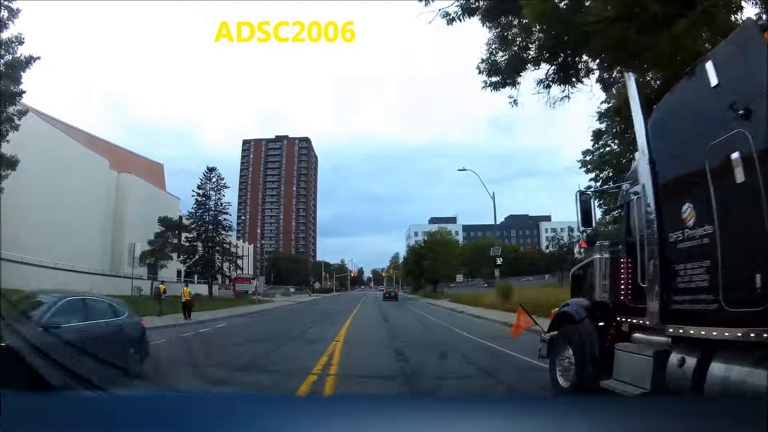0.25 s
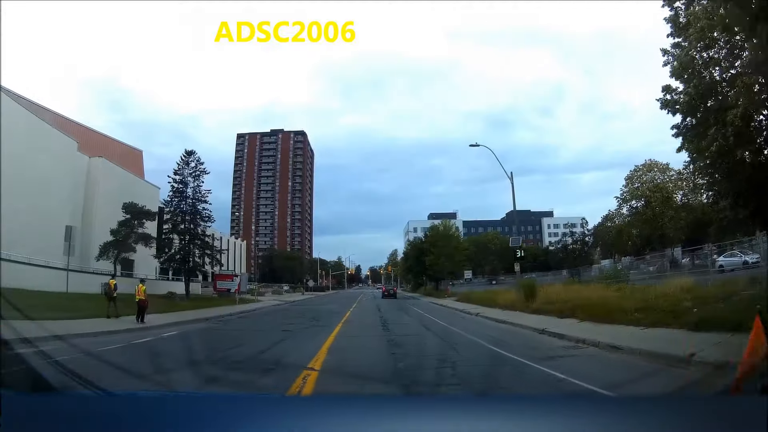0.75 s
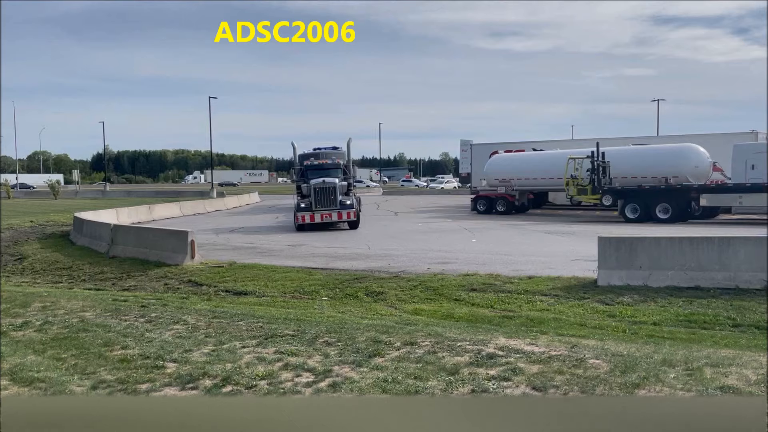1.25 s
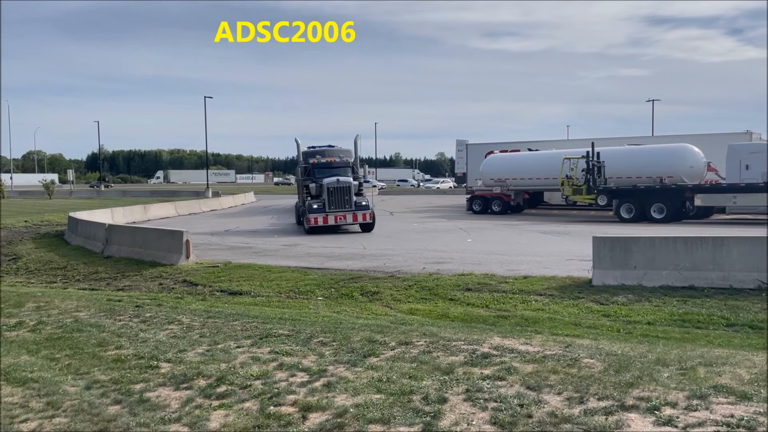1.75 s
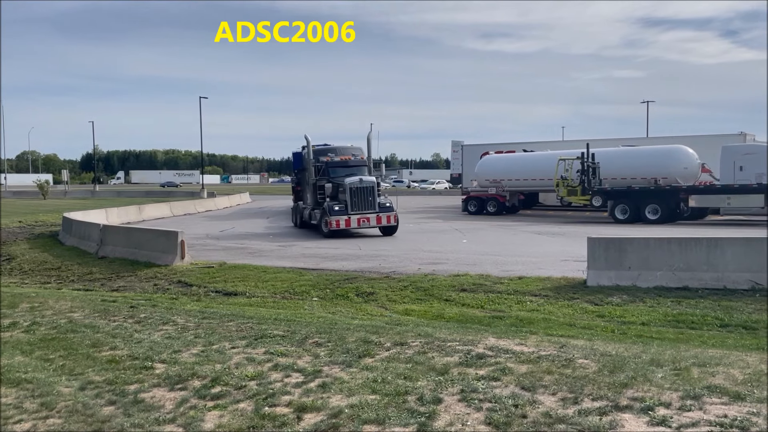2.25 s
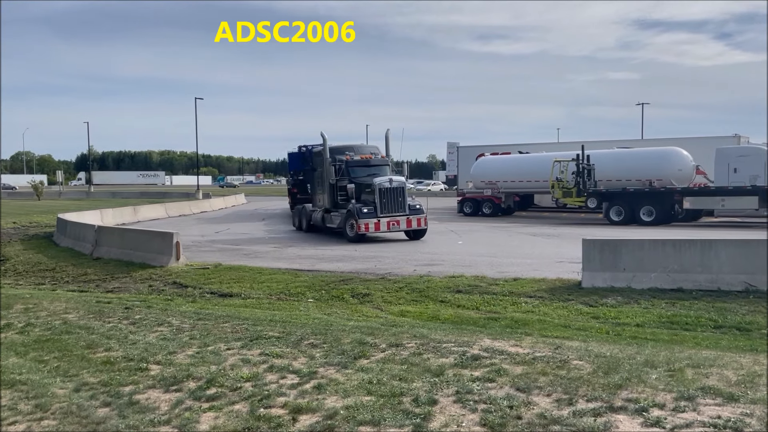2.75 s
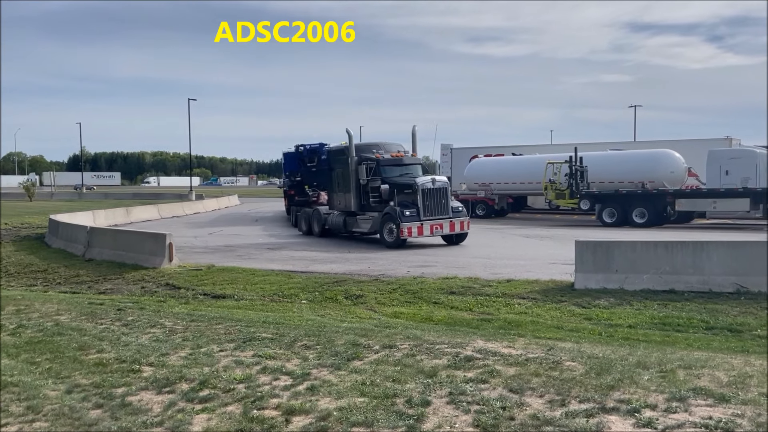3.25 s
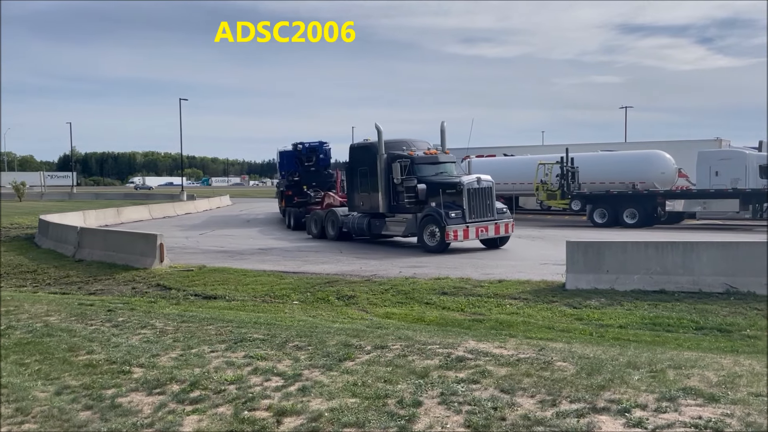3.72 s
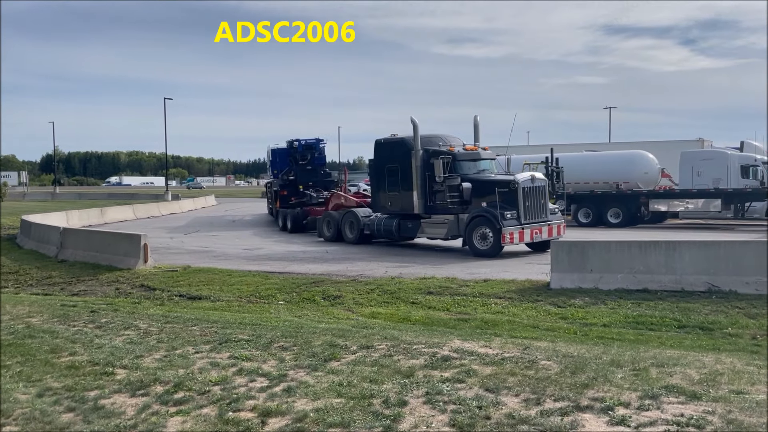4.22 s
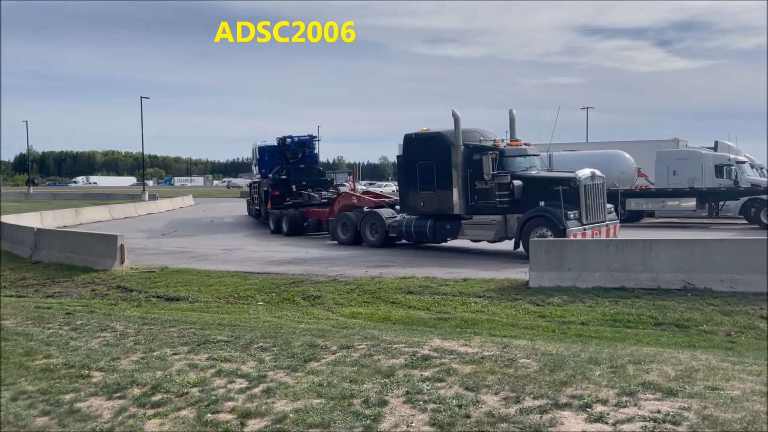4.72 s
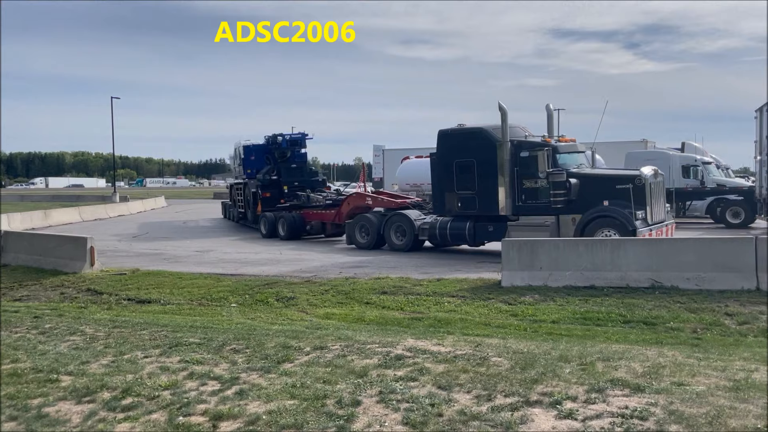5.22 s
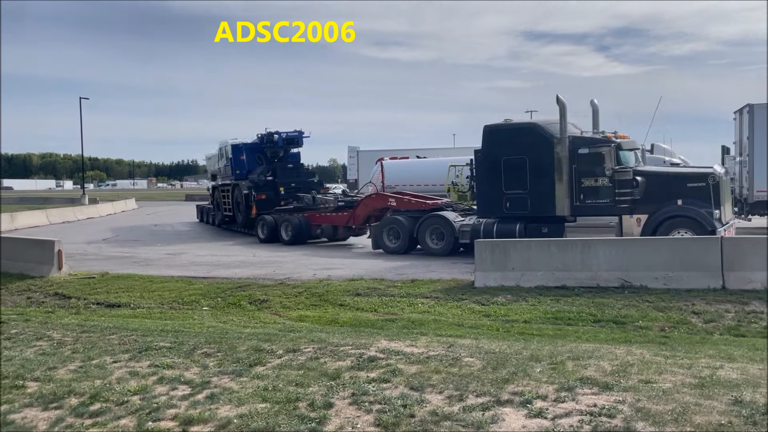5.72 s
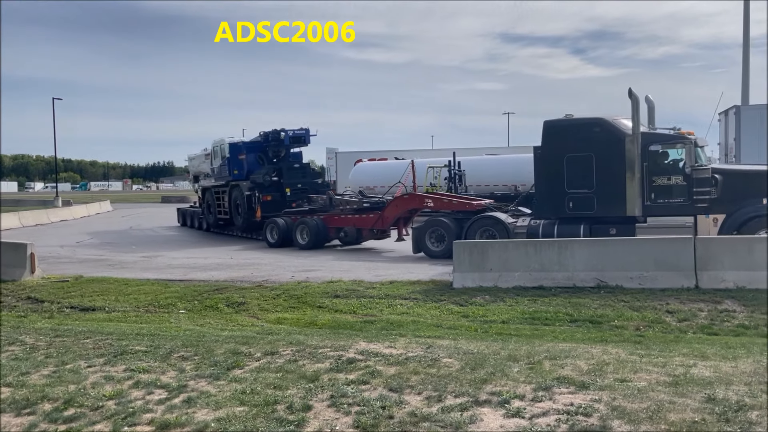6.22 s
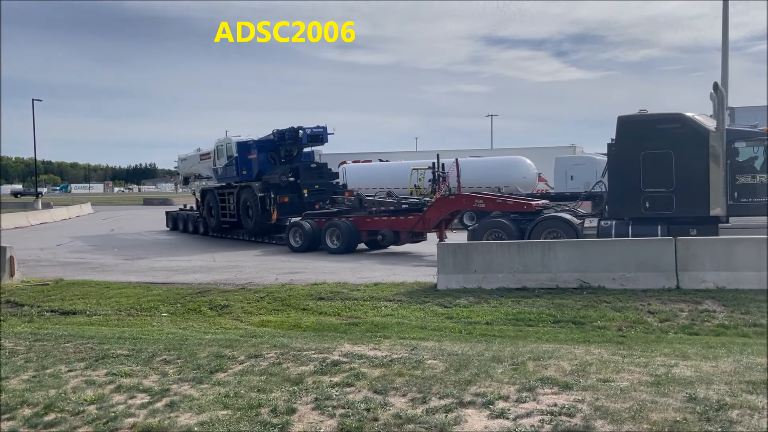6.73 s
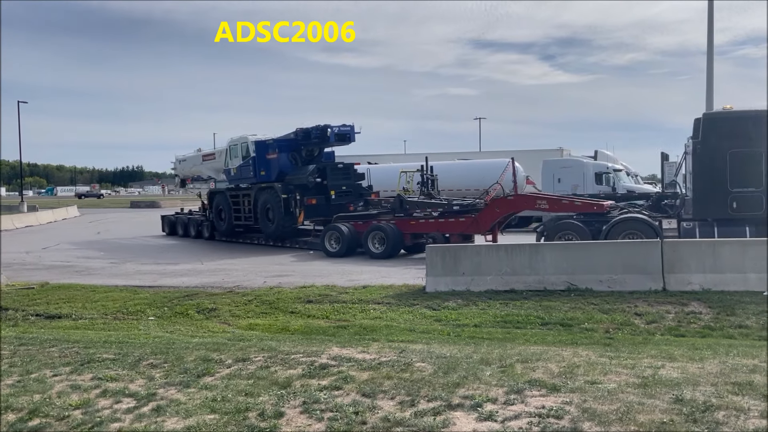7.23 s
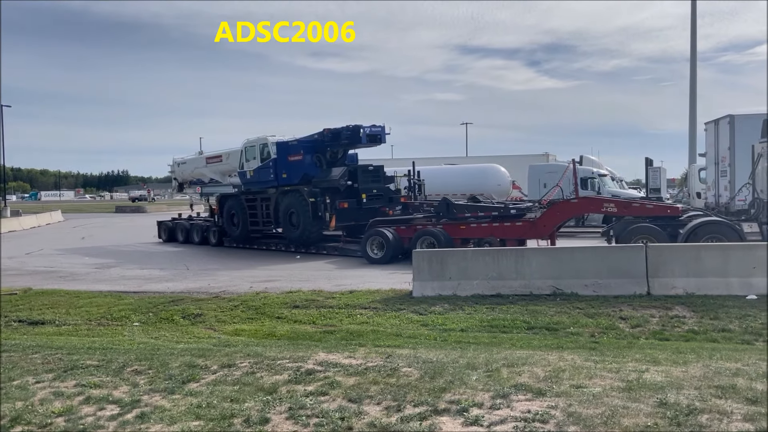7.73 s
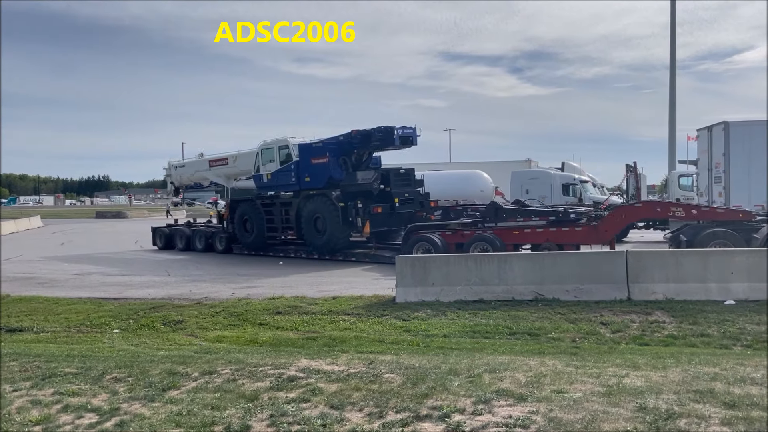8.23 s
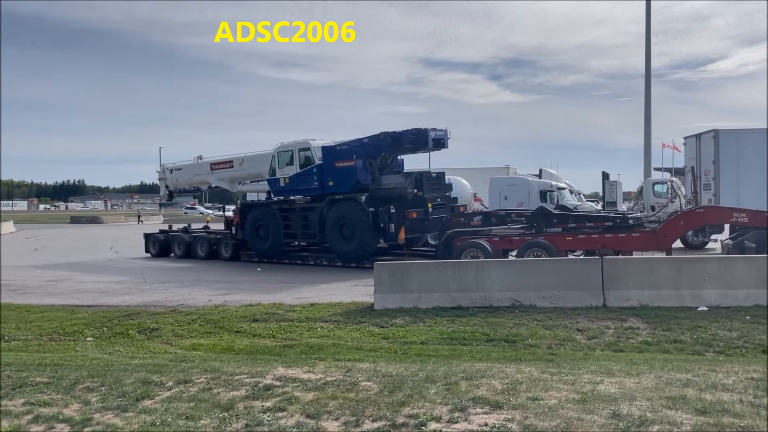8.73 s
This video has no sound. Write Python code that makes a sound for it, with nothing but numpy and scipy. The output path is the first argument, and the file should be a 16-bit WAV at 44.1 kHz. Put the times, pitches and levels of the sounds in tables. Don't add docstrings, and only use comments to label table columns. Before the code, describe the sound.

A phone-like microphone first catches close, boomy road rumble in a car, then abruptly stands on grass beside a truck lot. A diesel engine runs steadily with uneven knocks, panel clatter, ticking valve covers and airy fan noise. Brake squeal and air hisses come early, trailer clunks later, then loose fittings rattle and a thin high turbo whistle spools up over distant traffic.

```python
import sys
import numpy as np
from scipy import signal
from scipy.fft import rfft, irfft
from scipy.io import wavfile
from scipy.ndimage import uniform_filter1d

SR = 44100
rng = np.random.default_rng(int(sys.argv[2]) if len(sys.argv) > 2 else 0)


def dump(signal):
    limited = np.clip(np.atleast_2d(signal).T, -1, 1)
    pcm = np.round(limited * 32767).astype(np.int16)
    wavfile.write(sys.argv[1], SR, pcm)


def rack_gain(trim_db):
    fader = np.asarray(trim_db, float)
    return 10 ** (fader / 20)


N = 395577
T = np.arange(N) / SR
HZ = np.arange(N // 2 + 1) * SR / N
CAR_END_S, LOT_START_S = 1.341, 1.388


def level(x, db=0):
    return x * rack_gain(db) / np.sqrt(np.mean(x ** 2))


def curves(table):
    s, *columns = np.transpose(table)
    return [np.interp(T, s, c) for c in columns]


def over_hz(table, **ends):
    hz, value = np.transpose(table)
    return np.interp(np.log(HZ + 1), np.log(hz + 1), value, **ends)


def shape(x, gain):
    return irfft(rfft(x) * gain, N)


def modes(table):
    w = HZ + 1e-6
    out = 0
    for k, (hz, width, db) in enumerate(table):
        out = out + (-1) ** k * rack_gain(db) / (1 + 1j * hz / width * (w / hz - hz / w))
    return out


def noise():
    return rng.standard_normal(N)


def band_noise(hz, width):
    return level(shape(noise(), modes([(hz, width, 0)]) ** 2))


def walk(rate):
    k = int(SR / rate)
    held = np.repeat(rng.standard_normal(N // k + 1), k)
    return 1.3 * uniform_filter1d(uniform_filter1d(held, k), k)[:N]


def tone(hz):
    return np.sin(2 * np.pi * np.cumsum(hz) / SR)


def roar(gain, swell_db, flicker_db):
    white, swell, out = rfft(noise()) * gain, walk(4), 0
    for octave in range(4, 15):
        share = np.cos(np.pi / 2 * np.clip(np.log2(HZ + 1) - octave, -1, 1)) ** 2
        out = out + irfft(white * share, N) * rack_gain(swell_db * swell + flicker_db * walk(8))
    return level(out)


def burst(start, rise, hold, t60):
    t = T - start
    return np.clip(t / rise, 0, 1) * rack_gain(-60 * np.clip(t - rise - hold, 0, 5 * t60) / t60)


def swells(table, rest_db):
    bells = [rack_gain(db) * np.exp(-((T - s) / half) ** 2) for s, db, half, *_ in table]
    return np.array(bells + [rack_gain(rest_db) + 0 * T])


# f/Hz, level/dB
WHINE_TONES = [(7214, -78), (14422, -71)]


def electric_whine():
    return sum(rack_gain(db + 3.5) * np.sin(2 * np.pi * hz * T) for hz, db in WHINE_TONES)


# f/Hz, density/dB per Hz
ROAD_SPECTRUM = [(120, -41), (200, -6), (472, -9), (788, -8), (1220, -9), (1310, -18), (1410, -12),
                 (1700, -9), (1860, -21.5), (2490, -31), (3050, -31), (8800, -48), (13700, -45.5),
                 (15000, -47), (15800, -63)]
# f/Hz, width/Hz, level/dB
ROAD_RESONANCES = [(805, 34, -12.5), (1253, 23, -5), (1406, 61, -8.5), (2930, 330, -15.5), (5060, 530, -13)]


def road_roar(boom_db):
    gain = rack_gain(over_hz(ROAD_SPECTRUM, left=-60, right=-120))
    road = roar(gain * (1 + 4.2 * np.abs(modes(ROAD_RESONANCES))), 0.33, 0.52)
    road_db = -37.5 - 2 * np.minimum(T, CAR_END_S) + 0.1 * (boom_db + 19)
    return rack_gain(road_db) * road


# t/s, peak level/dB, treble level/dB, t60/s
TRIM_TICKS = [
    (0.1494, -44, -25, 0.06),
    (0.1619, -40.5, -21, 0.055),
    (0.1625, -36.5, -24, 0.044),
    (0.5396, -45, -28, 0.06),
    (1.1232, -44, -21, 0.06),
    (1.1432, -50.5, -16.5, 0.06),
    (1.1735, -32.5, -40, 0.056),
    (1.2144, -48, -24, 0.055),
]


def trim_ticks():
    low, high, out = band_noise(3070, 3200), band_noise(10500, 6000), 0
    for s, db, treble_db, t60 in TRIM_TICKS:
        out = out + rack_gain(db - 9) * burst(s, 0.00048, 0.0023, t60) * (low + rack_gain(treble_db + 6) * high)
    return out


# t/s, length/s, f/Hz, level/dB
PANEL_BUMPS = [
    (0.233, 0.07, 142, -30.5),
    (0.315, 0.06, 138, -29),
    (1.12, 0.15, 130, -38.5),
    (0.41, 0.061, 205, -46),
    (1.143, 0.15, 72, -30),
    (0.228, 0.071, 430, -44.5),
]


def panel_bumps():
    out = 0
    for s, length, hz, db in PANEL_BUMPS:
        swell = np.sin(np.pi * np.clip((T - s) / length, 0, 1))
        out = out + rack_gain(db + 4.5 * walk(24.9)) * swell * np.sin(2 * np.pi * hz * T)
    return out


# f/Hz, width/Hz, level/dB
DRUM_MODES = [(69, 16.2, 1), (112, 21, -3), (141.7, 12.2, -5.5), (192, 30, -8.5), (234.6, 47, -13)]


def body_drum(boom_db):
    return rack_gain(-32 + 0.41 * (boom_db + 20.5)) * level(shape(noise(), modes(DRUM_MODES)))


# t/s, level/dB, half length/s
ROAD_WAVES = [
    (.05, -17, 0.065),
    (.25, -17, 0.1),
    (.6, -21.5, 0.1),
    (1.01, -24.5, 0.037),
    (1.18, -33, 0.044),
]
# t/s, level/dB, half length/s, f/Hz
ROAD_JOINTS = [
    (0.225, -15, 0.054, 41.8),
    (.49, -20, 0.069, 36.6),
    (.92, -19.5, 0.0644, 44.1),
    (1.216, -21, 0.074, 42.7),
]


def cabin_boom():
    heave_db = 20 * np.log10(swells(ROAD_WAVES, -34).sum(0))
    booms = swells(ROAD_JOINTS, -31)
    boom_db = 20 * np.log10(booms.sum(0))
    boom_hz = np.array([row[-1] for row in ROAD_JOINTS] + [49.7]) @ booms / booms.sum(0)
    out = rack_gain(heave_db + 0.5) * tone(16 * (1 + 0.15 * walk(8)))
    out = out + rack_gain(boom_db - 1) * tone(boom_hz * (1 + 0.067 * walk(19.66)))
    out = out + rack_gain((heave_db + boom_db) / 2 - 4) * band_noise(26.7, 9.1)
    return out, boom_db


def car():
    boom, boom_db = cabin_boom()
    out = electric_whine() + road_roar(boom_db) + trim_ticks() + panel_bumps() + body_drum(boom_db) + boom
    out = np.tanh(out / 0.45) * 0.45
    return out * np.sin(np.pi / 2 * np.clip((CAR_END_S - T) / 0.006, 0, 1)) ** 2


# f/Hz, density/dB per Hz
HIGHWAY_SPECTRUM = [(22, -16), (40, -3.5), (75, 3.5), (130, -4.5), (250, -15), (450, -14), (750, -15.5),
                    (1250, -12), (2000, -22), (3000, -25.5), (5500, -42.5), (8000, -46.5), (12000, -55),
                    (15500, -71)]


def highway():
    return rack_gain(-40.5) * roar(rack_gain(over_hz(HIGHWAY_SPECTRUM, left=-42, right=-120)), 0.48, 0.32)


# t/s, level/dB, f/Hz, width/Hz, t60/s
TRAILER_CLUNKS = [
    (1.60, -29, 60.6, 30, 0.16),
    (1.729, -48, 895, 900, .04),
    (5.75, -35, 79, 40, 0.17),
    (6.17, -38, 65, 40, .15),
    (6.417, -36, 170, 180, 0.36),
    (6.418, -37, 95.5, 70, .2),
    (6.419, -39.5, 340, 250, 0.25),
    (7.105, -38.5, 150, 119, 0.08),
    (7.2, -39, 65, 40, .4),
]


def trailer_clunks():
    out = 0
    for s, db, hz, width, t60 in TRAILER_CLUNKS:
        out = out + rack_gain(db) * burst(s, 0.0046, 0.022, t60) * band_noise(hz, width)
    return out


# t/s, length/s, level/dB, centre f/Hz, width/Hz
AIR_PUFFS = [(1.52, 0.11, -62, 4500, 3000), (1.526, .12, -62, 8700, 2000), (1.64, 0.031, -58, 4500, 300),
             (1.807, 0.067, -47, 2900, 1200), (1.803, 0.11, -56, 9300, 3000), (1.815, .12, -52, 5500, 5800),
             (1.81, .11, -64, 15000, 1800), (3.952, 0.046, -54.5, 7600, 4600), (4.35, 0.13, -56, 3600, 600),
             (4.3, 0.19, -58, 6800, 2400), (4.88, .006, -64, 10500, 4000), (7.276, 0.064, -56, 4800, 3000)]


def air_puffs():
    out = 0
    for s, length, db, hz, width in AIR_PUFFS:
        out = out + rack_gain(db) * burst(s, 0.18 * length, length, 4 * length) * band_noise(hz, width)
    return out


# f/Hz, level/dB, hold/s, t60/s, sag/Hz per s
SQUEAL_TONES = [
    (14535, -55, .16, .2, 0),
    (15260, -59, .1, .4, 700),
    (15640, -58, .08, .35, -150),
    (9125, -68, .09, .15, 0),
    (10864, -78, .08, .15, 0),
    (8350, -70, .09, .15, 0),
]


def brake_squeal():
    out, t = 0, T - LOT_START_S
    for hz, db, hold, t60, sag in SQUEAL_TONES:
        squeal = tone(hz - sag * t + 15 * walk(76.6))
        out = out + rack_gain(db + 2.5 * walk(40)) * burst(LOT_START_S, 0.002, hold, t60) * squeal
    return out


def tap(hz, late):
    cycle = (T - 3.242) * 15.3 + 100 - late
    chance = rng.standard_normal((N // 1000, 2))[cycle.astype(int)].T
    since = cycle % 1
    blow = rack_gain(1.6 * chance[0]) * np.clip(since / 0.03, 0, 1) * np.exp(-since / 0.2)
    return blow, tone(hz + 40 * chance[1] + 60 * walk(150))


# t/s, level/dB
COVER_LEVEL = [(2.1, -68), (2.4, -58), (3.1, -58), (3.3, -55), (3.75, -56), (4.0, -62), (4.4, -59),
               (4.8, -75)]
# f/Hz, delay/cycles, level/dB
NEIGHBOUR_COVERS = [(2480, 0.474, -0.5), (3430, 0.21, -10.5)]
# t/s, level/dB
NEIGHBOUR_LEVEL = [(2.1, -58), (2.4, -43), (3.1, -43), (3.5, -46), (4.1, -46), (4.6, -65)]


def valve_covers():
    blow, ring = tap(2960, 0)
    tick = level(shape(noise(), modes([(3500, 500, 0), (6800, 3000, -8)]) ** 2), -12)
    neighbours = 0
    for hz, late, db in NEIGHBOUR_COVERS:
        side_blow, side_ring = tap(hz, late)
        neighbours = neighbours + rack_gain(db) * side_blow * side_ring
    return rack_gain(curves(COVER_LEVEL)[0] + 11) * blow * (ring + tick) + rack_gain(curves(NEIGHBOUR_LEVEL)[0]) * neighbours


# t/s, level/dB
RATTLE_LEVEL = [(6.9, -80), (7.3, -57), (7.6, -57), (8.4, -58), (8.97, -64)]
# f/Hz, width/Hz, level/dB
FITTING_MODES = [(3780, 300, 0), (2600, 350, 0)]


def trailer_rattle():
    jolts = noise() * rack_gain(3.5 * walk(60) + 0.8 * walk(11))
    return rack_gain(curves(RATTLE_LEVEL)[0]) * level(shape(jolts, modes(FITTING_MODES) ** 2))


# pitch ratio, heard from t/s, level/dB
BLADE_ROWS = [(7 / 11, 7.9, -61.5)]


def turbo():
    creep_s, whistle_s = 5.7, 6.5
    creep_hz = 6080 + 750 * np.maximum(T - creep_s, 0)
    spool_hz = 10800 - 1600 * (T - 8.6) ** 2
    hz = np.maximum(creep_hz, spool_hz)
    late = T - whistle_s
    db = -60 + np.minimum(22 * late, -6 * late)
    phase = 2 * np.pi * np.cumsum(uniform_filter1d(hz, size=4000) * (1 + 0.004 * walk(90))) / SR
    out = np.clip((T - creep_s) / 0.3, 0, 1) * rack_gain(db + 2 + 2.5 * walk(25)) * np.sin(phase)
    out = out + rack_gain(-84 + 8 * np.clip(hz / 1500 - 4.3, 0, 1)) * band_noise(15000, 2000)
    for ratio, s, row_db in BLADE_ROWS:
        out = out + np.clip((T - s) / 0.65, 0, 1) * rack_gain(row_db + 2.6 * walk(25)) * np.sin(ratio * phase)
    return out


# f/Hz, density/dB per Hz
AIR_SPECTRUM = [(3000, -5), (5000, -3.5), (8000, -3.5), (10000, -11.5), (13000, -28.5), (15600, -20)]


def cooling_air(near_db, knock):
    fan_db = 4.5 * np.clip((T - 3.83) / 0.45, 0, 1)
    boost_db = 1.5 * np.clip((T - 6.4) / 0.9, 0, 1)
    air = roar(rack_gain(over_hz(AIR_SPECTRUM, left=-60, right=-120)), 0.48, 0.59)
    return rack_gain(-64.5 + 1.2 * near_db + fan_db + boost_db) * air * (1 + 0.48 * knock)


# t/s, extra delay/ms, share 0-1
BARRIER_PATH = [(1.4, 1.68, .65), (3.5, 1.65, .75), (4.9, 1.58, .55), (6.2, 1.46, .3), (6.7, 1.2, .1),
                (7.1, .82, .3), (7.5, .8, .45), (8.97, .79, .35)]


def barrier(x):
    ms, share = curves(BARRIER_PATH)
    return x + np.clip(share, 0, 1) * np.interp(T - ms / 1000, T, x)


# f/Hz, width/Hz, level/dB
PANEL_MODES = [(1794, 470, 3), (2780, 810, -2.5), (3650, 1600, -10.5)]


def panel_clatter(near_db, knock):
    gated = noise() * (1 + 0.5 * knock) * rack_gain(1.3 * walk(12))
    clatter = level(shape(gated, modes(PANEL_MODES) / (1 + (HZ / 6500) ** 4)))
    return barrier(rack_gain(-52 + 1.74 * near_db) * clatter)


# f/Hz, width/Hz, level/dB
BLOCK_MODES = [(729, 244, 3.5), (1250, 143, -4), (480, 610, -18.5)]


def engine_block(near_db, knock):
    block = level(shape(noise() * (1 + 0.097 * knock), modes(BLOCK_MODES) / (1 + (HZ / 3000) ** 2)))
    return rack_gain(-45 + 1.6 * near_db) * block


# f/Hz, width/Hz, level/dB
PIPE_MODES = [(59.9, 27.7, -2), (84.1, 34.1, 0.5), (120.8, 49.7, -5.5), (211, 49, -11), (288, 79, -15.5)]


def exhaust(load_db, knock):
    pulses = rack_gain(load_db - 18) * level(knock - knock.mean())
    exhaust_db = -41.5 + 0.49 * T + walk(6) + 0.17 * load_db
    return rack_gain(exhaust_db) * level(shape(pulses + noise(), modes(PIPE_MODES)))


# t/s, firing rate f/Hz, load level/dB
ENGINE_DRIVE = [(1.4, 62, -8), (2.5, 66, -10), (3.5, 74, -8), (4.3, 75, -8), (5.5, 81, 0), (6.2, 86, -3),
                (6.7, 75, -12), (7.1, 64, -2), (7.5, 63, -4), (7.9, 76, -3), (8.97, 72, -8)]
# t/s, level/dB
TRUCK_NEARNESS = [(1.4, -44), (1.46, -42.5), (2.62, -44), (4.08, -43.5), (4.16, -40.5), (6.38, -44.5),
                  (6.44, -42.5), (6.65, -44.5), (8.78, -42), (8.97, -44.5)]


def diesel():
    hz, load_db = curves(ENGINE_DRIVE)
    near_db = uniform_filter1d(curves(TRUCK_NEARNESS)[0], size=4000) + 44
    firings = np.cumsum(hz * (1 + 0.02 * walk(30))) / SR
    cylinder_db = np.resize([2.5, -3.5, 2.5, 1.0, 6.5, -2.5], N // 100)
    chance_db = 4 * np.clip(rng.standard_normal(N // 100), -2, 1.2)
    strength = rack_gain(chance_db + cylinder_db)[firings.astype(int)]
    knock = strength * np.exp(-(firings % 1) / 0.73)
    return (cooling_air(near_db, knock) + panel_clatter(near_db, knock)
            + engine_block(near_db, knock) + exhaust(load_db, knock))


# f/Hz, left lead/rad
PORT_LEAD = [(0, 0), (800, -.5), (1300, .5), (2000, 1.3), (3000, .3), (3500, 1.1), (4700, .8), (5800, 2.5),
             (6600, 1.1), (7400, 1.5), (8550, 3.14), (14800, 12.57)]
# f/Hz, likeness 0-1
PORT_LIKENESS = [(60, 0.98), (300, 0.89), (900, 0.59), (1500, 0), (2500, 0.42), (3200, 0.38), (4000, 0.8),
                 (5800, 0.8), (7000, 0.99), (13000, 0.94), (16000, 0.8)]
# f/Hz, left minus right level/dB
PORT_TILT = [(100, 0.5), (900, -2.5), (1600, 0), (2600, 2.5), (5000, 4.5), (6000, -5.5), (7000, -1.5),
             (8500, 0)]


def ports(x):
    like = np.clip(over_hz(PORT_LIKENESS), 0, 1)
    lead = np.interp(HZ, *np.transpose(PORT_LEAD))
    tail = rng.standard_normal(16384) * rack_gain(-60 * np.arange(16384) / SR / 0.5)
    diffuse = rfft(tail / np.sqrt(np.sum(tail ** 2)), N)
    half = rack_gain(over_hz(PORT_TILT) / 2) * np.exp(0.5j * lead)
    same, apart = np.sqrt((1 + like) / 2), np.sqrt((1 - like) / 2) * diffuse
    return np.array([shape(x, half * (same + apart)), shape(x, (same - apart) / half)])


def scene():
    trailer = trailer_clunks() + air_puffs() + brake_squeal() + trailer_rattle()
    lot = ports(highway() + trailer + valve_covers() + turbo() + diesel())
    return car() + lot * np.clip((T - LOT_START_S) / 0.0031, 0, 1)


def top_cut(x):
    return signal.sosfilt(signal.butter(12, 16870, fs=SR, output="sos"), x)


def record(dry):
    lowpass = signal.ellip(10, 0.2, 70, 15750, fs=SR, output="sos")
    mix = signal.sosfilt(lowpass, dry)
    return top_cut(mix)


dry = scene()
out = record(dry)
dump(out)
```